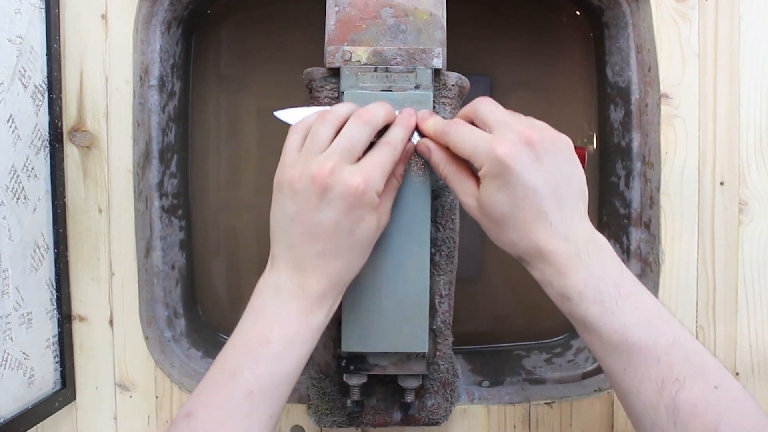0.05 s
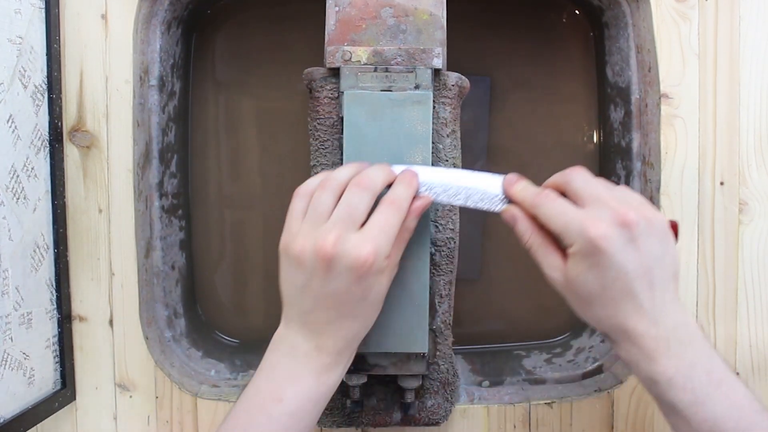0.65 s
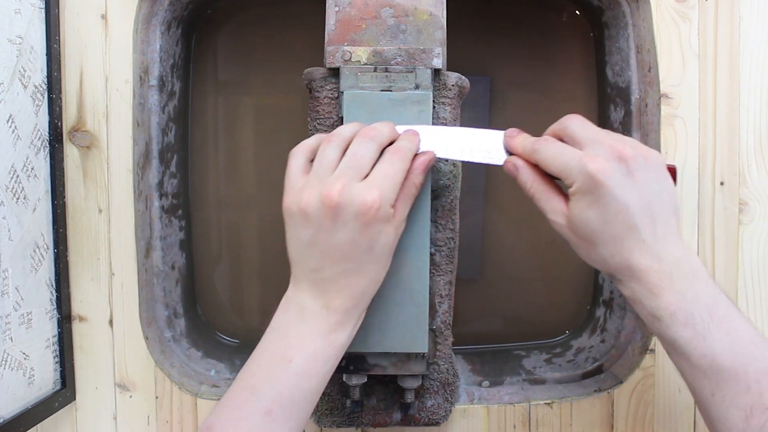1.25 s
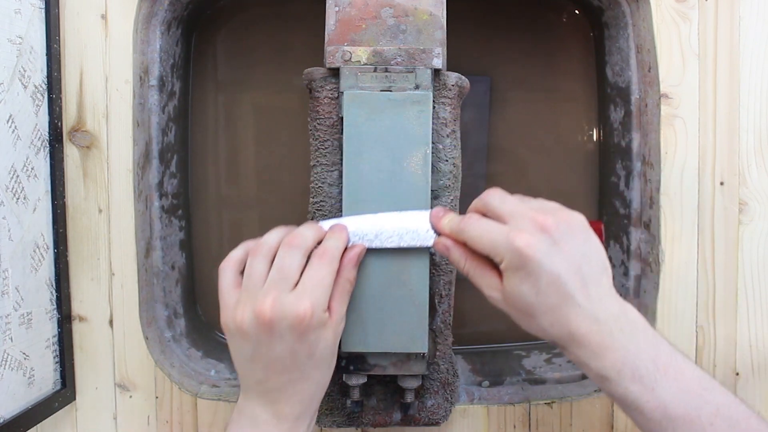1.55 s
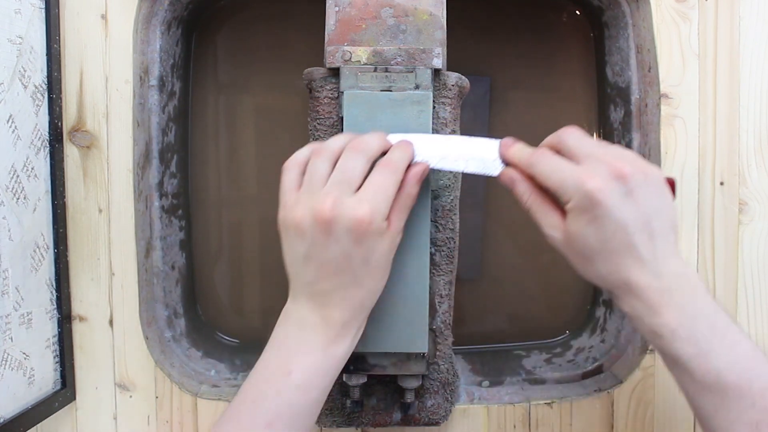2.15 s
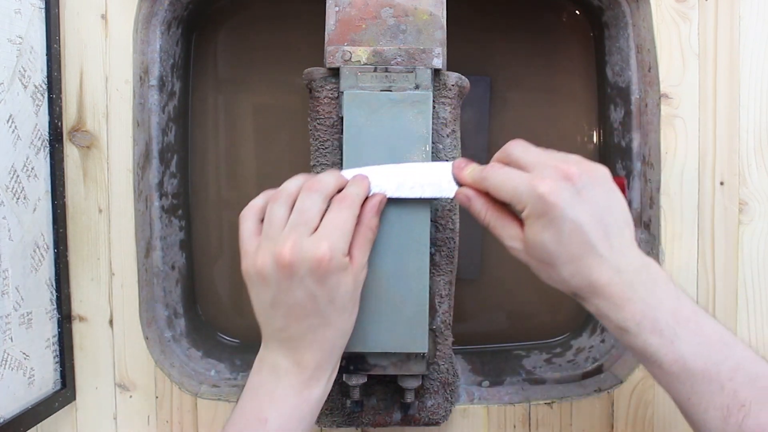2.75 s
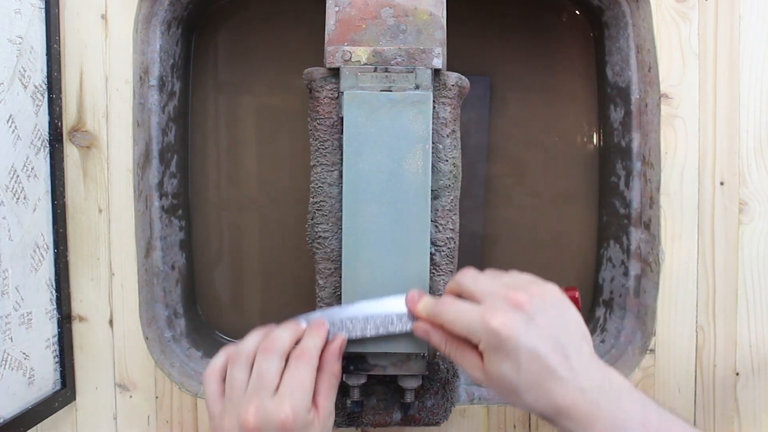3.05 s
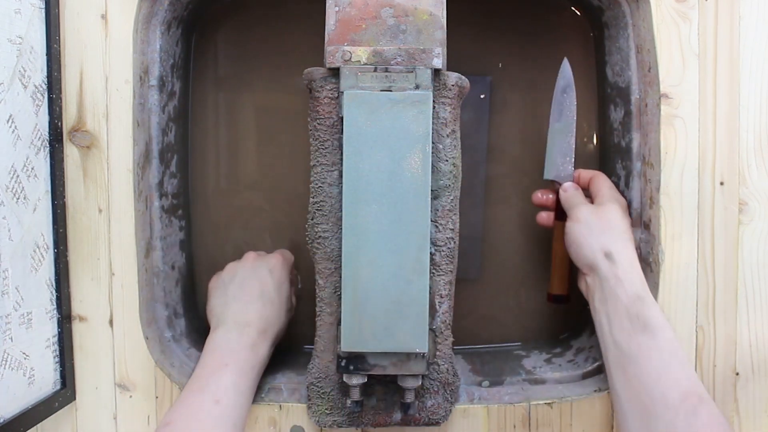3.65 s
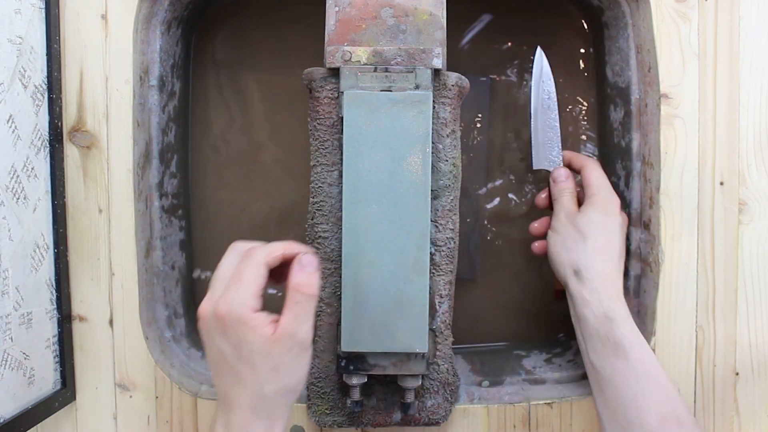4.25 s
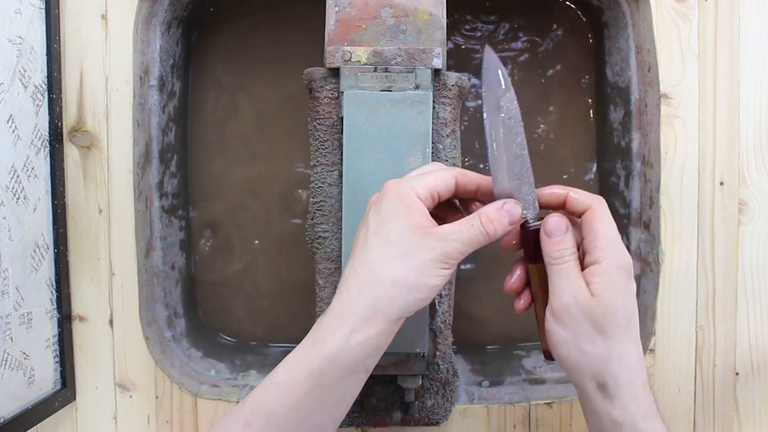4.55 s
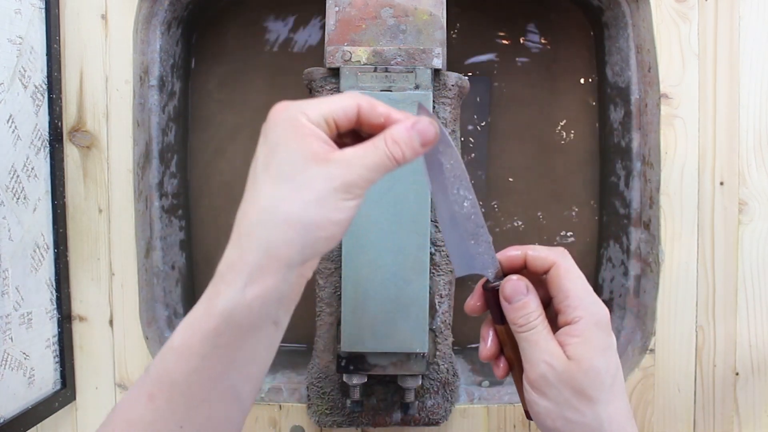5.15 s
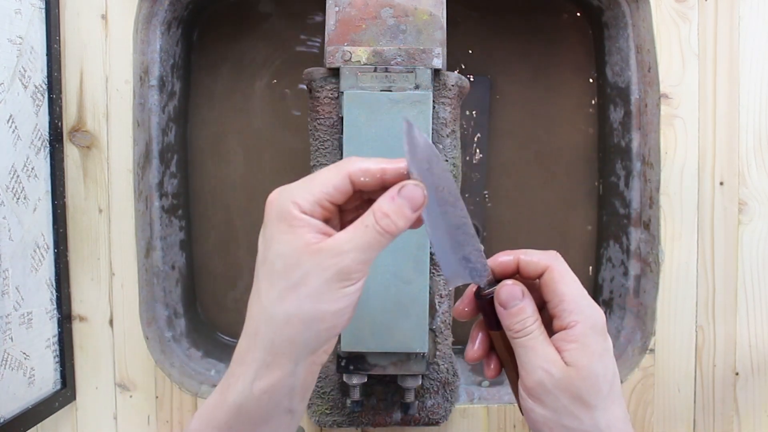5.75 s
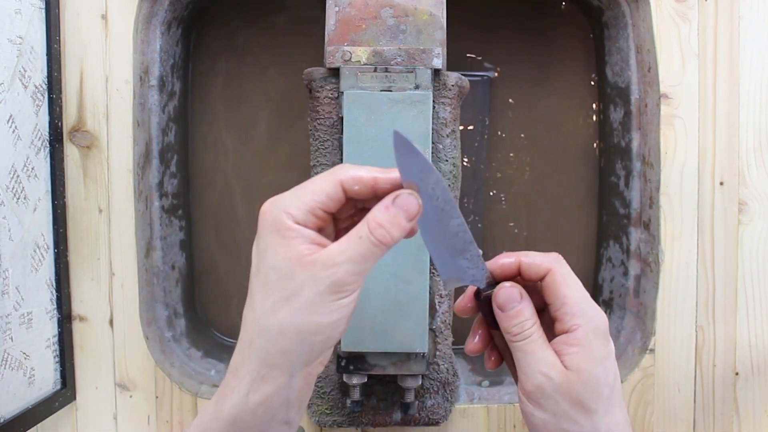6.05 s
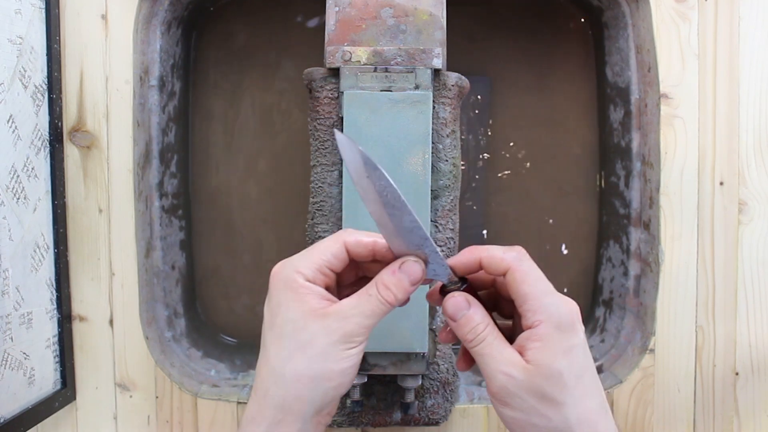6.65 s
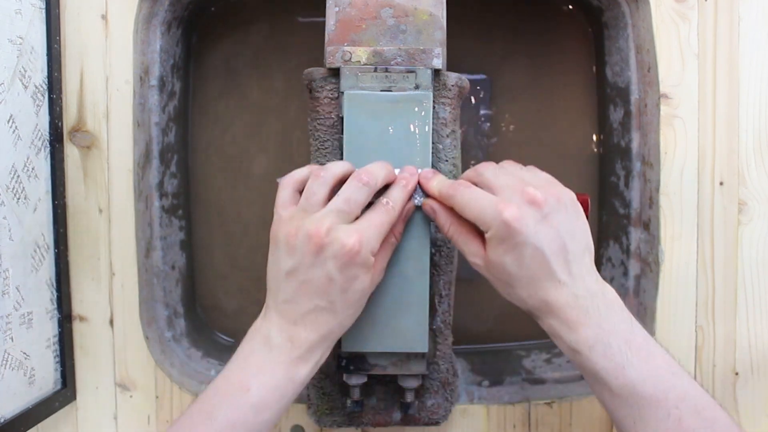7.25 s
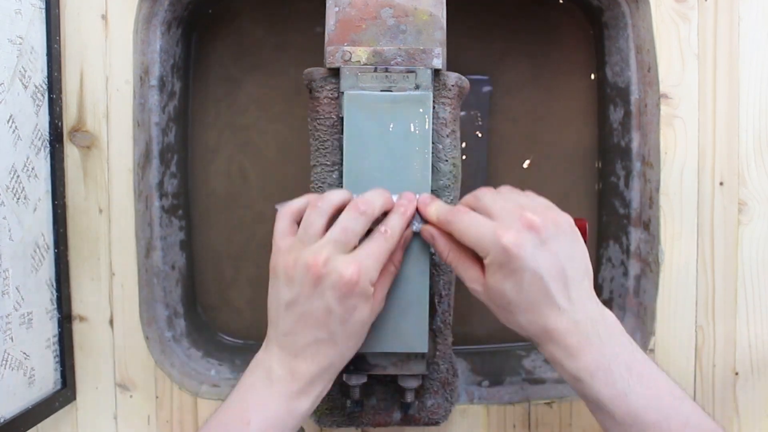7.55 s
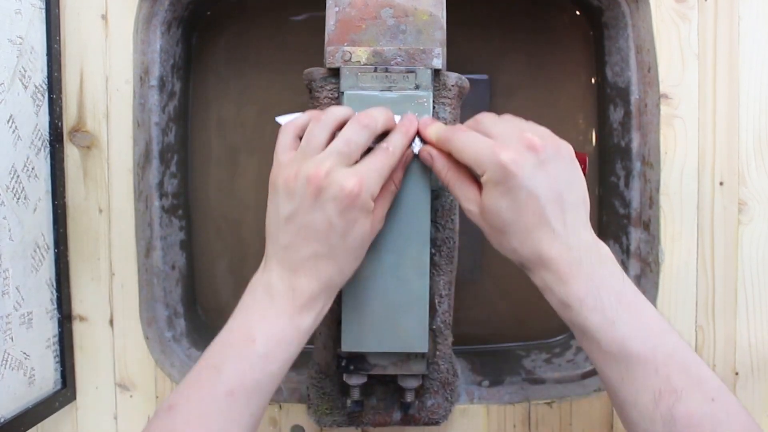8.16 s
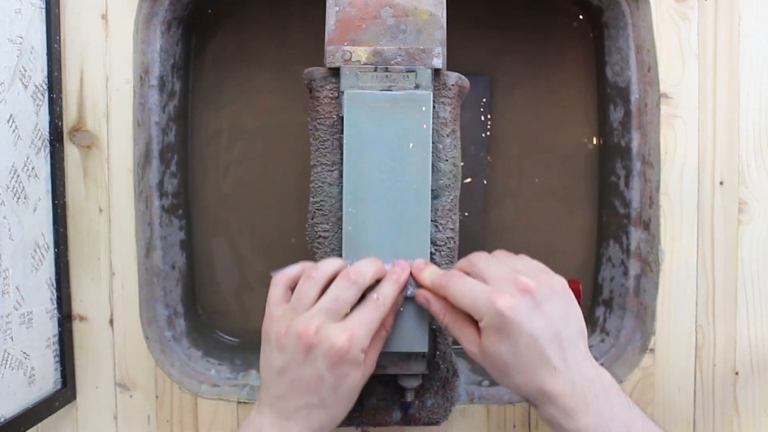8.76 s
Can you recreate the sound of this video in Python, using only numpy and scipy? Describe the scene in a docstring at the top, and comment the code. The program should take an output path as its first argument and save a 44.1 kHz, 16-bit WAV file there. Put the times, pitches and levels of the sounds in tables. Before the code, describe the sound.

A knife scrapes over a wet whetstone in long strokes, is rinsed with small splashes and drips, then scrapes in quick short strokes.

```python
"""Sharpening a knife

A steel knife sweeps over a wet whetstone above a tub, in a bare room with a faint hum. Grit hisses,
the stone rumbles, and the blade's ringing glides as the contact moves along the edge. The knife is
rinsed and drips, each drop trapping a ringing bubble; then its tip is worked in quick short strokes."""
import sys
import numpy as np
from scipy import signal
from scipy.fft import rfft, irfft
from scipy.io import wavfile
from scipy.ndimage import uniform_filter1d

SR = 44100
rng = np.random.default_rng(int(sys.argv[2]) if len(sys.argv) > 2 else 0)


def pcm_store(signal):
    """Save signal as 16-bit PCM."""
    levels = np.round(np.clip(np.atleast_2d(signal), -1, 1) * 32767)
    wavfile.write(sys.argv[1], SR, levels.astype(np.int16).T)


N = 388962
TIME = np.arange(N) / SR

# Levels in the tables are relative. A "place" runs along the edge from 0 (tip) to 1 (heel, by the handle).
# sweeps over the stone:
# (start [s], length [s], swell [s], hiss [dB], pressure [dB], ring [dB], first place, last place)
SWEEPS = [(-.04, 0.22, 0.049, -28.5, -40.5, -2, 0.656, 0.48),
          (0.142, 0.33, 0.019, -29.5, -44, -1, 0.81, .97), (1.103, .85, 0.28, -29, -41.5, 1, 0.027, 1.006),
          (2.46, 0.85, .21, -29, -43, 1, 0.098, 1.034)]
# gliding tones of the bending blade, each strongest at one place:
# (best place, reach [edge lengths], pitch there [Hz], glide [octaves per edge], width [Hz], level [dB])
GLIDING_TONES = [(.08, 0.16, 4000, -0.5, 600, 7), (.04, 0.13, 2340, 1.5, 300, 0),
                 (.28, 0.07, 7600, -4, 900, 2.5), (0.397, .11, 2500, 3.5, 150, 3.5),
                 (0.43, 0.12, 3780, -3, 590, 11), (.51, .07, 5550, 2.5, 900, 4.5),
                 (0.705, 0.2, 4110, -1.02, 640, 11.5), (.80, 0.39, 1480, -2.3, 260, -9),
                 (1.0, 0.069, 890, -2, 200, -1), (0.79, 0.064, 6100, 2.8, 1300, 0)]
# tones of blade and stone that stay put during a sweep: (pitch [Hz], width [Hz], level [dB])
STEADY_TONES = [(1850, 200, -24), (2337, 60, -5), (2700, 74, -15), (3213, 190, -4), (3536, 60, 1),
                (3780, 64, -11), (4290, 187, -0.5), (4660, 27, -5), (5020, 200, -2.5), (5170, 60, -17),
                (5410, 52, -1), (6620, 120, -2)]
# the edge catches and the steel rings out: (time [s], boost [dB])
CATCHES = [(2.92, 6), (2.96, 4)]
# strokes of the tip, pull and push in turn: (start [s], hiss [dB], ring added to the hiss level [dB])
STROKES = [(7.087, -36.5, 2), (7.187, -35, 7.5), (7.351, -37.5, 7), (7.511, -36, 8.5), (7.688, -35.5, 6),
           (7.862, -35.5, 7), (8.06, -36.5, 3), (8.245, -37, 3), (8.462, -36.5, 5), (8.644, -36.5, 4)]
# tones of the blade at its tip and heel, and of the stone's holder: (pitch [Hz], width [Hz], level [dB])
TIP_TONES = [(1218, 88, -17), (2380, 180, -17), (3670, 160, -20), (4350, 238, -2.5), (4580, 115, -7.5),
             (4960, 71, -11), (5340, 310, -14)]
HEEL_TONES = [(1720, 130, -10.5), (2340, 120, -12.5), (3590, 430, 3)]
HOLDER_TONES = [(235.4, 15, -13.5), (276, 34, -15), (313.6, 11.3, -15), (1060, 38, -12), (1441, 48, -8.5)]
# scratching grit and rumbling stone, in sweeps and under the tip: (frequency [Hz], level [dB])
SWEEP_GRIT = [(900, -40), (1800, -18), (2800, -7), (3400, 1.5), (4500, 5.5), (5800, 6.5), (7000, 4),
              (8500, 1), (10500, 0.5), (12800, -3), (15500, -7)]
SWEEP_RUMBLE = [(50, -50), (110, -7), (210, 1), (320, 2.5), (490, -6.5), (650, -6.5), (800, -12), (980, -9),
                (1150, 0.5), (1450, 1), (1900, 1.5), (2400, -1.5), (3000, 1), (6000, -35)]
TIP_GRIT = [(900, -15), (1800, 1.5), (2800, 1), (3400, 7.5), (4500, 6.5), (5800, 6.5), (7000, 2.5),
            (8500, 0.5), (10500, -0.5), (12800, -3), (15500, -9)]
TIP_RUMBLE = [(30, -17), (65, -7.5), (130, -1.5), (210, 2), (320, 0.5), (490, -6.5), (670, -4), (810, -8.5),
              (1000, -6.5), (1150, 0.5), (1450, 2), (1900, -3.5), (3000, -7.5), (6000, -28)]
# the blade lands or digs in at a turn: (time [s], level [dB], time to fade 60 dB [s])
TOUCHES = [(1.105, -42, .04), (2.460, -51, 0.04), (7.091, -23, 0.028), (7.384, -27, 0.14),
           (7.542, -31, 0.055), (8.257, -21, 0.088), (8.658, -25.5, 0.22)]
# the stone rocks in its holder: (time [s], level [dB])
KNOCKS = [(.465, -41), (1.12, -47.5), (1.985, -48.5), (2.94, -42), (7.66, -39.5), (8.426, -35)]
# drops in the tub: (time [s], level [dB], pitch [Hz], rise [octaves per s], swell [s], splash [dB])
DROPS = [(3.677, -41, 935, 3.4, 0.0018, -20), (3.793, -42.5, 2630, 3, .003, -13),
         (3.8, -48, 1047, 3.2, 0.011, -12), (3.841, -47, 1230, 1.8, 0.0027, -14),
         (3.854, -47.5, 3400, 2.4, .003, -2), (3.879, -42, 2460, 12, 0.0054, -7),
         (3.924, -42, 1770, 10, 0.0048, -10), (3.953, -36, 2940, 11, 0.0076, -1.5),
         (3.97, -38, 1730, 13, 0.0017, -1), (3.973, -40, 3290, 3.5, .005, -11),
         (4.192, -49, 3570, 2.16, .007, -9), (4.253, -35, 3910, 17, 0.00096, -17),
         (4.253, -47.5, 1160, 34, 0.0008, -2.5), (4.311, -38.5, 1130, 27, .001, -11),
         (4.384, -30.5, 3660, 24, 0.0028, -18), (4.408, -36, 1020, 27.4, 0.02, -14),
         (4.441, -35, 4150, 15, 0.0023, 0), (4.439, -39, 2560, 12, .0015, -17),
         (5.108, -45.5, 2810, 3.7, .0015, -9), (5.595, -31, 1673, 3.1, 0.0027, -18),
         (5.73, -47, 3900, 8, 0.01, -9), (5.878, -35.5, 3590, 23, 0.0018, -4)]
# the spatter of a drop: (frequency [Hz], level [dB])
SPRAY_SPECTRUM = [(500, -25), (1200, -3), (3000, 5), (5000, 4), (7500, -8), (9500, -11), (15000, -21)]
# wet hands and sloshing water: (start [s], length [s], level [dB], centre [Hz], width [Hz])
SWISHES = [(3.622, 0.05, -65, 11100, 1200), (3.746, 0.43, -54.5, 2420, 2620),
           (3.812, 0.11, -52.5, 6700, 2500), (3.998, 0.032, -55, 6370, 1200),
           (4.033, 0.14, -54.5, 278, 130), (4.18, .1, -64, 6700, 1200), (4.43, 0.086, -48, 5350, 2500),
           (4.852, 0.061, -61, 10100, 1200), (4.9, .5, -68.5, 8950, 3410),
           (5.876, 0.014, -42.5, 6760, 2200), (5.88, 0.24, -53.5, 74.4, 45), (6.318, .02, -62, 14800, 2000)]
# mains hum and the room's air: (frequency [Hz], level [dB])
HUM_TONES = [(119, -58.5), (67, -67.5), (385, -72.5)]
AIR_SPECTRUM = [(20, -6), (30, -5), (45, -15), (70, -7), (150, -10), (210, -9.5), (330, -13.5),
                (550, -15.5), (800, -13), (1200, -16), (2500, -21), (4300, -21), (5400, -25.5),
                (15500, -37.5)]
# how alike left and right are, for close sounds and for air: (frequency [Hz], likeness [0 to 1])
CLOSE_LIKENESS = [(100, 0.91), (250, 1), (1200, 1), (3000, 0.78), (5500, 0.72), (8500, 0.12), (14000, 0.28)]
AIR_LIKENESS = [(30, 0.2), (120, 0.4), (220, 0), (400, 0.02), (10000, 0)]
# how long the room rings: (frequency [Hz], time to fade 60 dB [s])
ROOM_FADE = [(200, 0.33), (700, 1), (1800, 1), (4500, 0.76), (8000, 0.56), (15000, 0.18)]
# how strongly the room rings: (frequency [Hz], level [dB])
ROOM_LEVEL = [(150, -12.5), (700, -8.5), (2000, -6), (5000, -5), (9000, -7), (15000, -8)]
# echoes off the tub and bench: (delay [s], level [dB])
ECHOES = [(.0013, -35), (.0031, -26), (.0052, -25), (.0094, -15)]
# balance of the two microphones: (frequency [Hz], left minus right [dB])
BALANCE = [(40, -2.5), (110, -2.5), (200, -0.5), (1300, -0.8), (4400, -0.4), (9000, 0.3)]


def long_sweeps(wobble_octaves=0.032, choke_db=-11, heel_damping_db=-4):
    """The contact travels along the edge, so the free lengths of steel change pitch."""
    hiss, pressure, ring, place = sweep_motion()
    grains = friction(grains_per_s=3300, size_db=2, smooth=1, chatter_db=1.2, chatter_hz=150)
    drive = ring * grit_patches(grains, patchy_db=3.5)
    gliding = np.zeros((2, N))
    for best, reach, hz, glide, width, db in GLIDING_TONES:
        pitch = hz * 2 ** (glide * (place - best) + wobble_octaves * wander(60))
        gliding += resonate(drive * gain_of(db) * hump(place, best, reach), pitch, width)
    # the steel rings less where it lies flat under the fingers, and near the handle
    free = gain_of(choke_db * hump(place, centre=.235, reach=.085))
    damped = gain_of(heel_damping_db * np.clip(2 * place - 1, 0, 1))
    chatter = friction(grains_per_s=5000, size_db=2, smooth=1, chatter_db=2.7, chatter_hz=120)
    steady = ring_tones(free * damped * ring * grit_patches(chatter, patchy_db=2), STEADY_TONES)
    # many overlapping tones merge into a broad rasp
    fine_grains = friction(grains_per_s=5000, size_db=-3.5, smooth=0.48, chatter_db=1, chatter_hz=139)
    rasp = resonate(free * hiss * fine_grains, hz=4600, width=2600)
    steel = gain_of(-4.5) * gliding + gain_of(-5.5) * steady + gain_of(2.5) * rasp
    return (scrape(hiss, pressure, SWEEP_GRIT, SWEEP_RUMBLE) + steel) * gain_of([[-1.3], [-.5]])


def sweep_motion(sag_db_per_s=6, release_s=.13, unload_s=0.0065, heel_db=8):
    """Each sweep lands lightly, swells, tires and lifts off; the hands press harder toward the heel."""
    hiss, pressure, ring, place = np.zeros((4, N))
    for start, length, swell_s, hiss_db, pressure_db, ring_db, first, last in SWEEPS:
        age = TIME - start
        along = first + (last - first) * np.clip(age / length, 0, 1)
        landing = np.clip(1 - age / swell_s, 0, 1)
        # the hands ease off the stone just before the blade lifts
        lift, unload = ((age >= 0) * np.sin(np.pi / 2 * np.clip((end - age) / release_s, 0, 1))
                        for end in (length, length - unload_s))
        slide = lift * gain_of(hiss_db - 20 * landing - sag_db_per_s * np.maximum(age - swell_s, 0))
        hiss += slide
        ring += slide * lift ** 0.21 * gain_of(ring_db)
        load = gain_of(pressure_db - 13.5 * landing + heel_db * (along - .5))
        pressure = np.maximum(pressure, unload ** 0.55 * load)
        place = np.where(age >= 0, along, place)
    slowed = gain_of(-4 * hump(TIME, centre=3.025, reach=.05))  # the hand slows once in mid-sweep
    caught = gain_of(sum(db * hump(TIME, when, reach=0.0098) for when, db in CATCHES))
    return hiss * slowed, pressure, ring * slowed * caught, place


def short_strokes(last_end_s=8.96, turn_db=-16, pressure_db=-40):
    """Each push or pull speeds up and slows; at the turn the tip barely slides."""
    pull, push = (0.55, 0.001), (0.19, 0.0067)  # (share spent speeding up, run-on [s])
    hiss, pressure, ring = np.zeros((3, N))
    turns = [row[0] for row in STROKES[1:]] + [last_end_s]
    for k, ((start, hiss_db, ring_db), turn) in enumerate(zip(STROKES, turns)):
        peak, run_on = push if k % 2 else pull
        end = turn + run_on
        progress = np.interp(TIME, [start, start + (end - start) * peak, end], [0, .5, 1])
        speed = np.abs(np.sin(np.pi * progress)) ** 0.72
        slide = (TIME >= start) * (TIME < end + .01) * np.maximum(speed, gain_of(turn_db))
        # the hiss depends most on speed, the rumble least
        hiss = np.maximum(hiss, slide ** 0.9 * gain_of(hiss_db + 2.5))
        pressure = np.maximum(pressure, slide ** 0.51 * gain_of(pressure_db))
        ring = np.maximum(ring, slide ** .85 * gain_of(hiss_db + ring_db))
    grains = friction(grains_per_s=3500, size_db=2, smooth=.7, chatter_db=2, chatter_hz=150)
    steel = ring_tones(ring * grit_patches(grains, patchy_db=4.5), TIP_TONES)
    return (scrape(hiss, pressure, TIP_GRIT, TIP_RUMBLE) + steel) * gain_of([[-.9], [-.7]])


def scrape(hiss, pressure, grit_spectrum, stone_spectrum):
    """The grit hisses with speed, and the stone rumbles and rings under the load."""
    fine = friction(grains_per_s=7000, size_db=-1.5, smooth=0.99, chatter_db=2, chatter_hz=131)
    scratch = colour(hiss * grit_patches(fine, patchy_db=2.5), grit_spectrum, band_hz=(6500, 15000))
    coarse = friction(grains_per_s=4000, size_db=2.5, smooth=0.65, chatter_db=-0.37, chatter_hz=80)
    load = pressure * grit_patches(coarse, patchy_db=0.44)
    rumble = colour(load, stone_spectrum, band_hz=(150, 1600))
    return scratch + gain_of(1.5) * rumble + ring_tones(load, HOLDER_TONES)


def friction(grains_per_s, size_db, smooth, chatter_db, chatter_hz):
    """Bits of grit break under the edge, in clumps as the steel sticks and slips."""
    hits = rng.random(N) < grains_per_s / SR
    size = hits * gain_of(size_db * np.minimum(rng.exponential(1, N), 4))
    force = (unit_level(size) + smooth) * gain_of(chatter_db * wander(chatter_hz))
    return spread(unit_level(force * rng.standard_normal((2, N))), CLOSE_LIKENESS)


def grit_patches(sound, patchy_db):
    """The edge keeps meeting new grit, so narrow bands of the scrape flare up and fade."""
    bands = signal.stft(sound, nperseg=512)[2]
    patches = uniform_filter1d(rng.standard_normal(bands.shape[1:]), 4, axis=0)  # smooth over pitch
    patches = uniform_filter1d(patches, 9, axis=1)  # and over time
    flare = unit_level(gain_of(patchy_db * unit_level(patches)))
    return signal.istft(bands * flare, nperseg=512)[1][:, :N]


def blade_touches(tick_db=-7):
    """A short jolt against the stone ticks and rings the blade."""
    force = jolts(TOUCHES)
    return ring_tones(force, TIP_TONES) + gain_of(tick_db) * colour(force, TIP_GRIT)


def stone_knocks(fade_s=0.22):
    """A change of load rocks the stone with a dull thud."""
    force = jolts([(start, db, fade_s) for start, db in KNOCKS])
    return resonate(force, hz=260, width=330)


def heel_bite(start_s=0.156, rise_s=0.01, fade_s=0.43, force_db=-22):
    """After the first turn the heel digs into the stone and rings hollowly until it slides free."""
    age = TIME - start_s
    force = np.clip(age / rise_s, 0, 1) * gain_of(force_db - 60 * np.maximum(age, 0) / fade_s)
    grains = friction(grains_per_s=4000, size_db=1.5, smooth=1, chatter_db=1.5, chatter_hz=140)
    return ring_tones(force * grains, HEEL_TONES)


def water_drops(bubble_fade_s=0.12, splash_fade_s=0.084, spray_db=2.5, gurgle_db=2.5):
    """Each drop spatters, churns the surface and traps a bubble whose pitch climbs as it rises."""
    bubbles, spray = np.zeros((2, 2, N))
    t = np.arange(SR // 5) / SR
    for start, db, hz, rise, swell, splash_db in DROPS + swirl_bubbles():
        pitch = hz * 2 ** np.minimum(rise * t, 1)
        # a bubble that climbs fast reaches the surface and dies sooner
        fade_s = 1 / (1 / bubble_fade_s + abs(rise) / 0.77) + swell
        loudness = np.minimum(t / swell, 1) ** 2 * gain_of(-60 * np.maximum(t - swell, 0) / fade_s)
        tone = 1.59 * loudness * np.sin(2 * np.pi * np.cumsum(pitch) / SR)
        noise = 0.77 * rng.standard_normal(len(t)) + .5 * rng.standard_normal((2, len(t)))
        splash = noise * gain_of(splash_db - 60 * t / splash_fade_s)
        gurgle = gain_of(gurgle_db) * resonate(splash, hz * 1.09, width=0.38 * hz)
        add(bubbles, start, gain_of(db) * (tone + gurgle))
        add(spray, start, gain_of(db + spray_db) * splash)
    return (bubbles + colour(spray, SPRAY_SPECTRUM)) * gain_of([[-3.2], [-1.8]])


def swirl_bubbles(count=9, start_s=3.79, end_s=4.02, low_hz=1042, high_hz=6100):
    """Swirling the knife in the water makes small random bubbles, listed like the rows of DROPS."""
    return [(start_s + (end_s - start_s) * when, -46.5, low_hz * (high_hz / low_hz) ** pitch,
             7.2, .003, -12) for when, pitch in rng.random((count, 2))]


def wet_swishes():
    """Wet fingers and stirred water make soft uneven swishes."""
    mix = np.zeros((2, N))
    noise = spread(rng.standard_normal((2, N)), CLOSE_LIKENESS) * gain_of(1.5 * wander(60))
    for start, length, db, hz, width in SWISHES:
        part = noise[:, round(start * SR):][:, :round(length * SR)]
        soft_ends = signal.windows.tukey(part.shape[-1], .7)
        add(mix, start, gain_of(db) * unit_level(resonate(part, hz, width)) * soft_ends)
    return mix


def air_and_hum(air_db=-52.5):
    """Still air and a slightly wavering mains hum."""
    air = gain_of(air_db) * colour(spread(rng.standard_normal((2, N)), AIR_LIKENESS), AIR_SPECTRUM)
    hum = sum(gain_of(db + 1.5 * wander(6)) * np.sin(2 * np.pi * hz * TIME + .3 * wander(4))
              for hz, db in HUM_TONES)
    return (air + hum) * gain_of([[-.2], [.2]])


def room(sound, tail_db, echoes_per_s=4000):
    """Adds near echoes off the tub and bench, then a blurred tail that dies first in the treble."""
    echoes = rng.standard_normal((2, SR)) * (rng.random((2, SR)) < echoes_per_s / SR)
    echoes *= TIME[:SR] > .008
    hz, t, bands = signal.stft(echoes, SR, nperseg=256)
    fade_s = read_curve(ROOM_FADE, hz)[:, None]
    fade = gain_of(tail_db + read_curve(ROOM_LEVEL, hz)[:, None] - 60 * t / fade_s)
    fade *= np.sqrt(2 * np.log(1000) / fade_s)  # a longer tail spreads the same energy more thinly
    response = signal.istft(bands * fade, SR, nperseg=256)[1] / np.linalg.norm(echoes[0])
    for delay, db in ECHOES:
        add(response, delay, gain_of(db) * np.array([1, 2, 1]) / 4)
    return sound + signal.fftconvolve(sound, response, axes=1)[:, :N]


def jolts(rows):
    """Short bursts of noise, each falling 60 dB in its fade time."""
    force, t = np.zeros((2, N)), np.arange(SR // 5) / SR
    for start, db, fade_s in rows:
        add(force, start, rng.standard_normal(len(t)) * gain_of(db - 60 * t / fade_s))
    return force


def resonate(sound, hz, width):
    """Makes a sound ring around one pitch, which may move; white noise keeps its level."""
    spin = np.exp(2j * np.pi * np.cumsum(hz * np.ones(sound.shape[-1])) / SR)
    decay = np.exp(-np.pi * width / SR)
    ring = signal.sosfilt([[(1 - decay) ** 2, 0, 0, 1, -2 * decay, decay * decay]], sound / spin + 1e-18)
    return 2 * (spin * ring).real / np.sqrt((1 - decay) / 2)


def ring_tones(sound, tones):
    """Makes a sound ring at several steady pitches."""
    f = np.fft.rfftfreq(N, 1 / SR)
    response = sum(gain_of(db) * np.sqrt(2 * SR / (np.pi * width)) / (1 + 2j * (f - hz) / width) ** 2
                   for hz, width, db in tones)
    return irfft(rfft(sound) * response, N)


def colour(noise, spectrum, band_hz=(0, SR)):
    """Shapes the bass and treble of white noise, so the given band holds the power the noise had."""
    f = np.fft.rfftfreq(N, 1 / SR)
    gain = gain_of(read_curve(spectrum, f))
    inside = (f >= band_hz[0]) & (f <= band_hz[1])
    return irfft(rfft(noise) * gain / np.sqrt(np.mean(gain ** 2 * inside)), N)


def spread(pair, likeness):
    """Blends two unrelated noises into a left and a right that are partly alike."""
    same = np.clip(read_curve(likeness, np.fft.rfftfreq(N, 1 / SR)), -1, 1)
    mid, side = rfft(pair) * np.sqrt([(1 + same) / 2, (1 - same) / 2])
    return irfft(np.array([mid + side, mid - side]), N)


def wander(hz):
    """A random drift of typical size 1, with wiggles up to about hz per second."""
    f = np.fft.rfftfreq(N, 1 / SR)
    return unit_level(irfft(rfft(rng.standard_normal(N)) / (1 + (f / hz) ** 4), N))


def hump(x, centre, reach):
    """A smooth hump of height 1."""
    return np.exp(-((x - centre) / reach) ** 2)


def gain_of(db):
    """Turns decibels into a multiplier."""
    return 10 ** (np.asarray(db) / 20)


def unit_level(x):
    """Scales a signal to an average (rms) level of 1."""
    return x / np.sqrt(np.mean(x ** 2) + 1e-20)


def read_curve(points, hz):
    """Reads between the rows of a table, with frequency spaced by octaves."""
    f, value = np.transpose(points)
    return np.interp(np.log(hz + 1), np.log(f + 1), value)


def add(mix, start_s, sound):
    """Adds a sound to a stereo mix at the given time."""
    part = mix[:, max(round(start_s * SR), 0):][:, :sound.shape[-1]]
    part += sound[..., :part.shape[-1]]


def scene():
    """Steel on stone close by; the water lies lower and carries more of the room's echo."""
    knife = long_sweeps() + short_strokes() + blade_touches() + stone_knocks() + heel_bite()
    return room(knife, tail_db=0.5) + room(water_drops() + wet_swishes(), tail_db=1.5) + air_and_hum()


def record(dry, cutoff_hz=15830):
    """The two microphones differ slightly in tone, and the highest treble is cut off."""
    lean_db = read_curve(BALANCE, np.fft.rfftfreq(N, 1 / SR)) / 2
    heard = irfft(rfft(dry) * gain_of([lean_db, -lean_db]), N)
    treble_cut = signal.firwin(511, cutoff_hz, window=("kaiser", 9), fs=SR)
    return signal.oaconvolve(heard, treble_cut[None], "same")


dry = scene()
out = record(dry)
pcm_store(out)
```